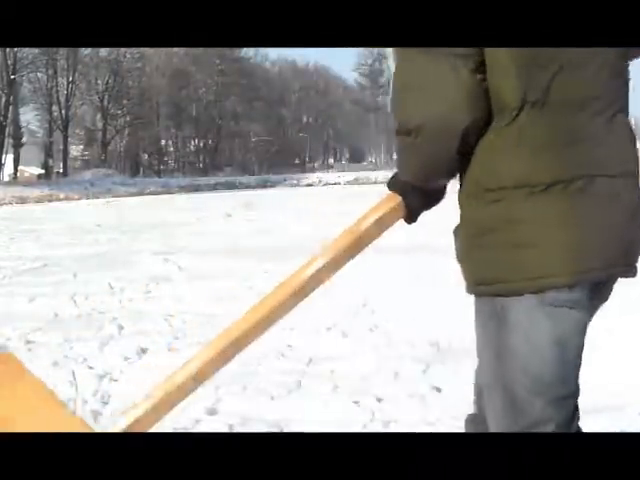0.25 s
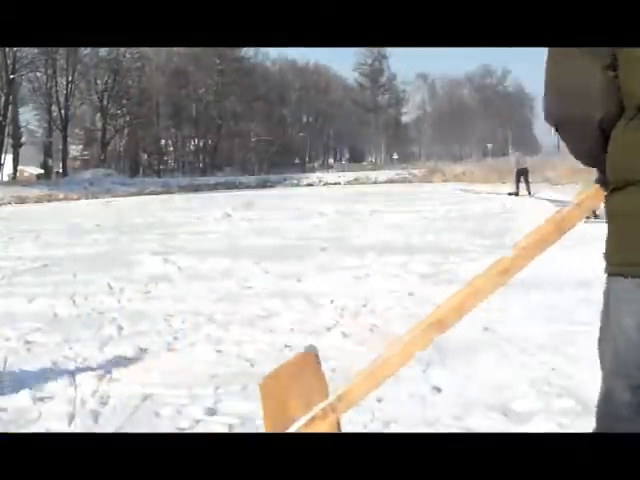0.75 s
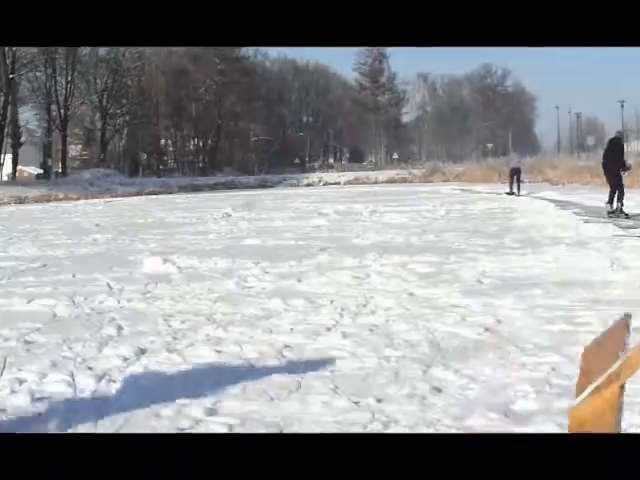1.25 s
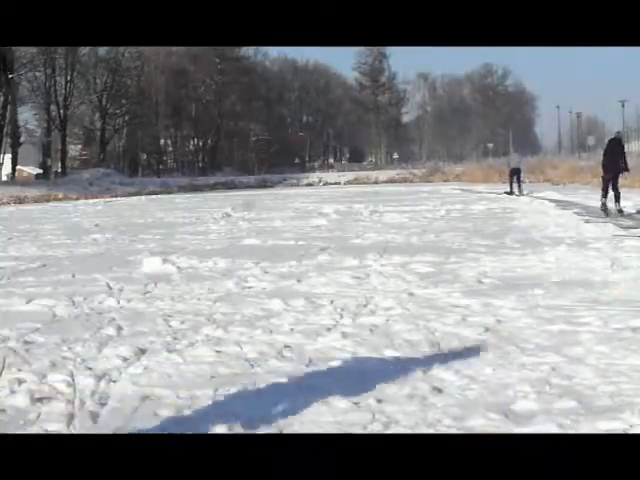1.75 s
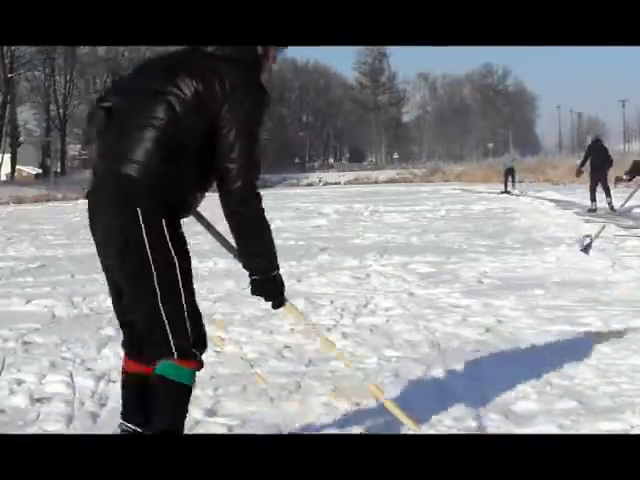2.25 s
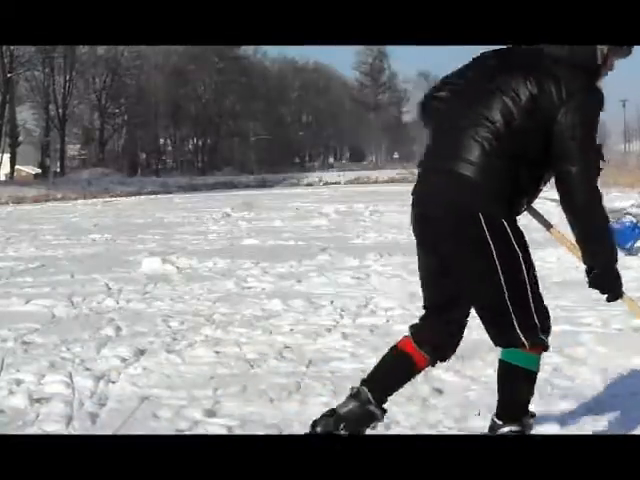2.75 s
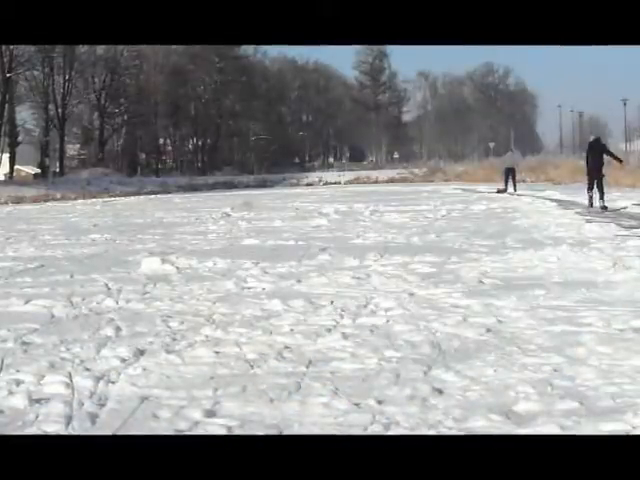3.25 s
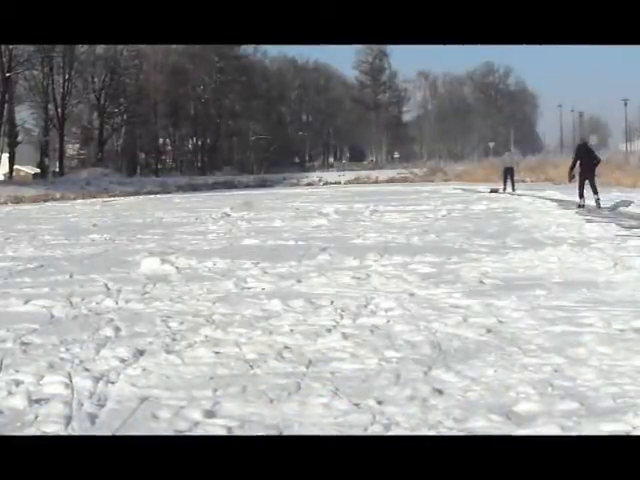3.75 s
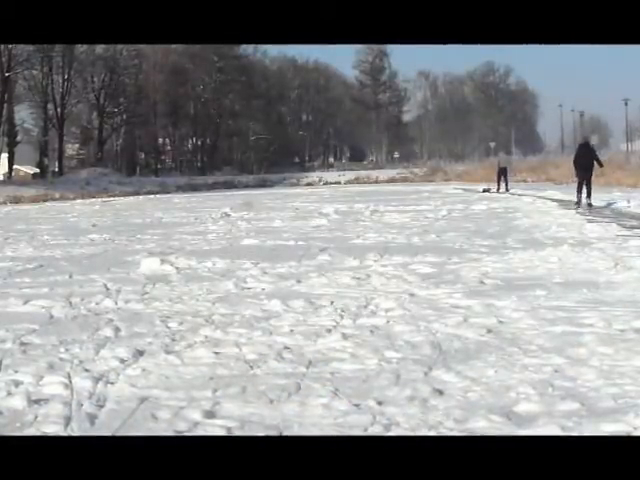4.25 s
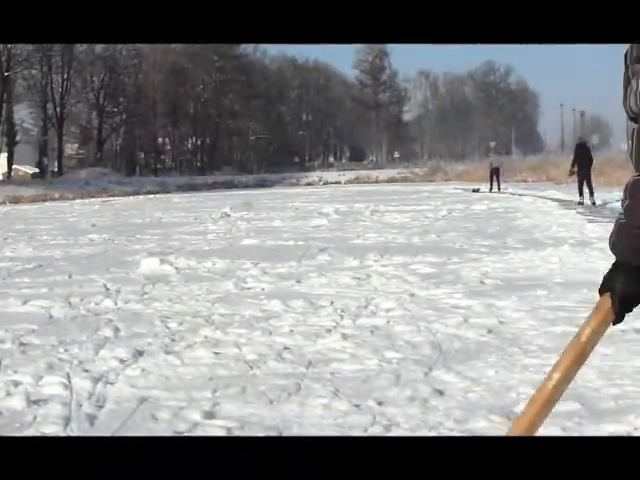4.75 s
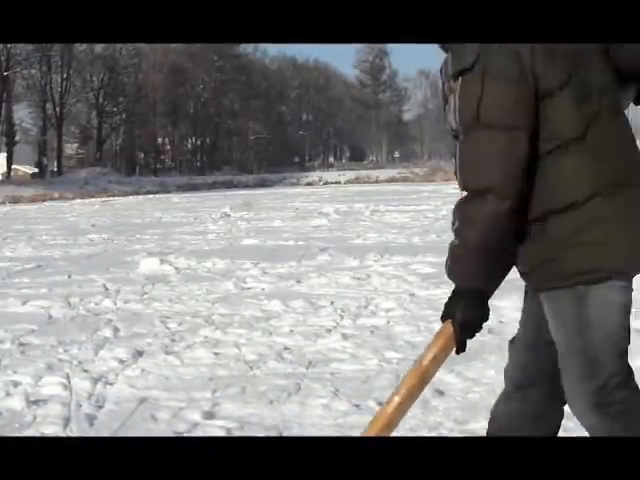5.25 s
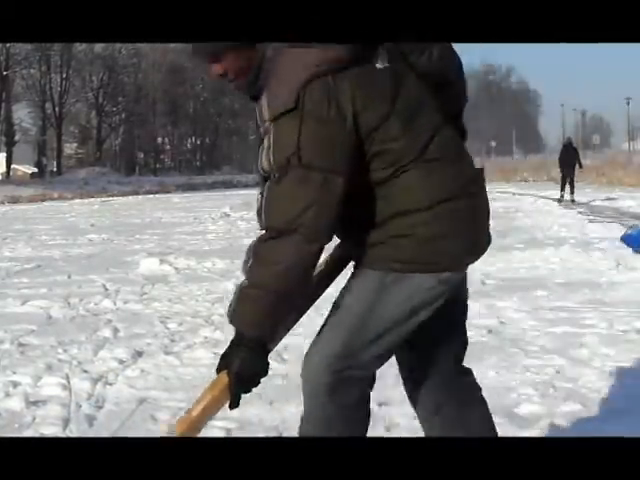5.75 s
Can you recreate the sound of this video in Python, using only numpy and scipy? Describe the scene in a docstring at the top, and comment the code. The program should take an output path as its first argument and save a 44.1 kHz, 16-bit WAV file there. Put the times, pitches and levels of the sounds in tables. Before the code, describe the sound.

Close open-air stereo, sound leaning right: light scuffs and a rattling double knock, a loud slam, then a hollow grating drone with a singing metallic edge. Next comes a rougher shovel pushing crushed snow, with icy thuds and crunches, cut off fairly abruptly. Quieter dull scraping continues to a small dry clack. Low wind bursts buffet the microphone over faint hiss.

```python
"""On a frozen river, snow shovels pass to the right: a blade is dropped, rattles, slams down on the ice and is pushed
along. Tiny fractures under its edge drive a drone, a singing edge resonance and a hiss of crushed snow; rattling
blows leave the blade ringing, and near the end another object gives a dry clack. Lumps of ice thud as damped sines;
crunches and ticks are short noise bursts. Wind buffets two microphone ports as separate low noises over a faint
hiss; the loudest peaks flatten in overload."""
import sys
import numpy as np
from scipy import signal
from scipy.fft import rfft, irfft, next_fast_len
from scipy.io import wavfile
from scipy.ndimage import uniform_filter1d, map_coordinates

SR = 44100
rng = np.random.default_rng(int(sys.argv[2]) if len(sys.argv) > 2 else 0)


def ratio(d):
    """dB to gain"""
    e = np.asarray(d, float) / 20
    return 10 ** e


def generate_wav(sig):
    """Save sig (samples, or channels by samples) to the path in sys.argv[1] as 16-bit PCM at SR."""
    pcm = np.round(np.clip(np.atleast_2d(sig).T, -1, 1) * 32767).astype(np.int16)
    wavfile.write(sys.argv[1], SR, pcm)


N = 264687


def unit(x):
    """Scale to an rms of 1."""
    return x / np.sqrt(np.mean(x ** 2) + 1e-20)


def along(points, hz):
    """Read (Hz, value) points on a log frequency axis."""
    f, v = np.transpose(points)
    return np.interp(np.log(hz + 1), np.log(f + 1), v)


def curves(rows, t):
    """Read each column after the time at times t."""
    s, *cols = np.transpose(rows)
    return [np.interp(t, s, c) for c in cols]


def wobble(rate):
    """A smooth random curve with rate knots a second."""
    knots = rng.standard_normal(int(N * rate / SR) + 4)
    return map_coordinates(knots, [np.arange(N) * rate / SR])


def filtered(x, response):
    """Shape x with a real or complex response of frequency."""
    m = next_fast_len(N + SR // 2)
    return irfft(rfft(x, m) * response(np.fft.rfftfreq(m, 1 / SR)), m)[..., :N]


def causal(points):
    """A short minimum-phase impulse with the colour of (Hz, dB) points, energy 1."""
    colour = ratio(along(points, np.fft.rfftfreq(4096, 1 / SR)))
    cepstrum = irfft(np.log(colour + 1e-4))
    # folding the cepstrum forward puts the energy at the start
    cepstrum[1:2048] *= 2
    cepstrum[2049:] = 0
    pulse = irfft(np.exp(rfft(cepstrum)))
    return pulse / np.linalg.norm(pulse)


def grit(rate, scatter_db):
    """Tiny fractures of uneven size, on average rate a second, at an rms of 1."""
    breaks = rng.random(N) < rate / SR
    return unit(breaks * rng.standard_normal(N) * ratio(scatter_db * rng.exponential(size=N)))


def beside(z, hz, t):
    """Place the spectra of a mid and a side sound as a partly alike pair, left later and weaker."""
    # Likeness of left and right. Each row: frequency in Hz, correlation.
    alike = [(300, 1), (1000, .98), (2500, 0.9), (5000, 0.85), (10000, 0.75)]
    # Path of the source. Each row: time in seconds, left lag in microseconds, left-over-right level in dB.
    sideways = [(.4, 0, -10), (.55, 0, -6), (1.5, 10, -6.5), (2.2, 35, -7), (3.5, 63, -6.5), (6, 63, -7)]
    lag, pan_db = curves(sideways, t)
    turn = np.arccos(np.clip(along(alike, hz), 0, 1))[:, None] / 2
    mid, side = np.cos(turn) * z[0], np.sin(turn) * z[1]
    # half of the lag and level goes to each side
    tilt = ratio(pan_db / 2) * np.exp(-1j * np.pi * hz[:, None] * lag / 1e6)
    pair = np.array([(mid + side) * tilt, (mid - side) / tilt])
    return signal.istft(pair, SR, nperseg=512)[1][:, :N]


def sheet(t60):
    """The many close modes of a thin blade: a fading noise tail of energy 1."""
    seconds = np.arange(SR // 2) / SR
    tail = rng.standard_normal(SR // 2) * ratio(-60 * seconds / t60)
    return tail[None] / np.linalg.norm(tail)


def contacts(t):
    """All sliding contacts at times t: (drone dB, edge centre and width Hz, hiss dB, edge gain dB, voice)."""
    # A bare blade pushed away over clean ice. Each row: time in seconds, drone level in dB before wavering.
    bare = [(.96, -28.5), (1.21, -26), (1.47, -29), (1.66, -33), (1.72, -37.5), (1.85, -34.5), (2.05, -39),
            (2.3, -35.5), (2.75, -47.5), (3.0, -62)]
    # Its edge sings higher as it speeds up, then sags and blurs.
    # Each row: time in seconds, edge resonance in Hz, its width in Hz.
    glide = [(1.0, 2050, 1150), (1.25, 2650, 1100), (1.55, 3050, 1150), (2.0, 2900, 1900),
             (2.3, 2650, 1500), (2.8, 2750, 1800)]
    # A blade loaded with snow comes past, shoves and stops.
    # Each row: time in seconds, drone level in dB before wavering, snow hiss in dB over the drone.
    loaded = [(2.1, -41.5, -21.5), (2.7, -32.5, -4.5), (2.82, -31, -2.5), (3.02, -33, -8), (3.19, -33, 1.5),
              (3.27, -30, -3.5), (3.5, -33.5, 1), (3.7, -32.5, 1), (4.2, -27, 4.5), (4.36, -31.5, 6.5),
              (4.5, -42.5, 4), (4.78, -46, 4), (4.87, -62, -4)]
    # A blade deep in snow draws near, muffled. Each row: time in seconds, drone level in dB before wavering.
    buried = [(4.3, -47), (4.6, -40), (5.05, -45.5), (5.45, -45), (5.8, -37), (5.87, -43), (6.0, -36.5)]
    # Light scuffs of a dragged blade. Each row: start in seconds, drone level in dB before wavering,
    # length before the fade in seconds, starting edge resonance in Hz, snow hiss in dB over the drone.
    scuffs = [(-.08, -62.5, 0.078, 1640, 1), (0.19, -67, .1, 1190, -9), (0.322, -47.5, 0.11, 2770, -8),
              (0.622, -40, 0.052, 2050, -7), (0.762, -44, .2, 2020, -6), (4.848, -59, 0.18, 2630, -16),
              (5.847, -44.5, 0.065, 2200, -4.5)]
    # Voice of each contact: drone pitch ratio, edge in dB over the drone, top of the hiss in Hz,
    # ringing share from 0 to 1. The bare edge gets a further gain and the loaded hiss dulls, both below.
    bare_voice = (1.043, 5.1, 10200, 0.41)
    loaded_voice = (1.0, -1, 9796, 0.15)
    buried_voice = (.81, -14, 5100, .03)
    scuff_voice = (.9, 4, 5500, .04)

    def inside(rows):
        """Silence, in dB, outside the time span of a contact."""
        return -150 * ((t < rows[0][0]) | (t > rows[-1][0]))

    # bare: edge and hiss gain 3 dB a second on the drone as the blade leaves
    bare_db = curves(bare, t)[0] + inside(bare)
    thin_db = 3 * (t - bare[0][0])
    rows = [(bare_db, curves(glide, t), -2 + thin_db, thin_db, bare_voice)]

    # loaded: as the blade slows, its hiss dulls
    pitch, edge_db, top_hz, ringing = loaded_voice
    loaded_db, loaded_hiss_db = curves(loaded, t)
    dulling_hz = np.interp(t, (4.41, 4.52), (top_hz, 7200))
    rows.append((loaded_db + inside(loaded), (2670, 2400), loaded_hiss_db, 0,
                 (pitch, edge_db, dulling_hz, ringing)))

    buried_db = curves(buried, t)[0] + inside(buried)
    rows.append((buried_db, (2450, 830), -29.5, 0, buried_voice))

    attack_s, fade_db_per_s, rise_hz_per_s, width_hz = 0.033, 75, 3200, 1550
    for s, db, length, edge_hz, hiss_db in scuffs:
        attack_db = 20 * np.log10(np.clip((t - s) / attack_s, 1e-4, 1) ** 2)
        fade_db = fade_db_per_s * np.maximum(t - s - length, 0)
        rising_hz = edge_hz + rise_hz_per_s * np.clip(t - s, 0, length)
        rows.append((db + attack_db - fade_db, (rising_hz, width_hz), hiss_db, 0, scuff_voice))
    return rows


def scrape():
    """Fractures under the edge drive the low drone, a resonance of the edge, and the hiss."""
    # Strongest resonances of the sliding blade.
    # Each row: centre in Hz, width in Hz, peak in dB over the direct sound.
    chatter = [(889, 54, 7), (7160, 1000, 12.5)]
    # Colour of the drone at pitch ratio 1. Each row: frequency in Hz, relative density in dB per Hz.
    drone_colour = [(180, -38), (300, -17), (468, -2.5), (963, 5), (1160, 3), (2400, -4), (3120, -107.5),
                    (5280, -120)]
    # Colour of the crushed snow. Each row: frequency in Hz, relative density in dB per Hz.
    hiss_colour = [(2000, -28.5), (3600, -6.5), (5200, -2.5), (7400, -7), (9500, -6.5), (12000, -3.5)]
    # The blade skips and the scrape drops out for a moment.
    # Each row: centre in seconds, level change in dB, length in seconds.
    skips = [(1.561, -7, 0.012), (1.764, -5, 0.026), (2.676, -4, 0.011), (3.46, -4, 0.037),
             (3.64, -5, 0.013), (5.072, -8, 0.021)]

    def strong(f):
        """The direct sound plus the resonances."""
        return 1 + sum(ratio(db) * 1j * f * w / (c * c - f * f + 1j * f * w) for c, w, db in chatter)

    def band(gain):
        """A spectral gain at an rms of 1."""
        return gain / np.sqrt(np.mean(gain ** 2, axis=0))

    rub = np.array([grit(9000, 0.56), grit(9000, 0.64)])
    # on bare ice the blade rings; deep snow damps it
    now = contacts(np.arange(N) / SR)
    loudness = sum(ratio(db) for db, *_ in now)
    share = np.clip(sum(ratio(db) * voice[-1] for db, *_, voice in now) / loudness, 0, 1)
    modes = signal.fftconvolve(rub, sheet(t60=0.058), axes=1)[:, :N]
    ringing = unit(filtered(modes, strong))
    rub = np.sqrt(1 - share) * rub + np.sqrt(share) * ringing
    rub = rub * ratio(0.86 * wobble(35) + 0.79 * wobble(13))

    hz, t, z = signal.stft(rub, SR, nperseg=512)
    f, power = hz[:, None], 0
    for drone_db, (edge_hz, width_hz), hiss_db, gain_db, (pitch, edge_db, top_hz, _) in contacts(t):
        drone = band(ratio(along(drone_colour, f / pitch)))
        edge = band(1 / (1 + ((f * f - edge_hz ** 2) / (f * width_hz + 1)) ** 2))
        hiss = band(ratio(along(hiss_colour, f)) / np.sqrt(1 + (f / top_hz) ** 14))
        layers = drone ** 2 + (edge * ratio(edge_db + gain_db)) ** 2 + (hiss * ratio(hiss_db)) ** 2
        power = power + ratio(2 * drone_db) * layers
    skips_db = sum(db * np.exp(-((t - s) / length) ** 2) for s, db, length in skips)
    # patches of time and frequency waver at random
    patches = uniform_filter1d(uniform_filter1d(rng.standard_normal(power.shape), 6, 0), 12, 1)
    return beside(z * np.sqrt(power) * ratio(skips_db + 1.73 * unit(patches)), hz, t)


def blows():
    """Each blow is a dense rattle of contacts that dies away, with more or less ringing after it."""
    # Rattling blows of a blade, and a last dry clack of another object with hardly any ringing.
    # Each row: start in seconds, relative level in dB, rattle in seconds,
    # fade of the rattle by 60 dB in seconds, treble in dB, ringing in relative dB.
    strikes = [(0.553, -24, 0.035, 0.06, 3.5, -6), (.596, -28.5, 0.0042, 0.082, -16, 2),
               (.614, -32, 0.02, 0.038, 3.5, -10.5), (.939, -15, 0.037, 0.2, -12.5, -21.5),
               (5.824, -33.5, 0.013, 0.064, -4.5, -32)]
    # Ringing modes of the blade. Each row: frequency in Hz, relative level in dB before scatter,
    # fade by 60 dB in seconds.
    blade = [(884, -23.5, 0.52), (1053, -30, 0.74), (1455, -11, 0.24), (2010, -22.5, 0.32),
             (4795, -21.5, 0.16), (6800, -24, .05)]
    # Body of a blow. Each row: frequency in Hz, relative density in dB per Hz.
    crash = [(120, -44.5), (250, -16), (600, -10.5), (900, -2.5), (1300, -8.5), (2400, -11.5), (3200, -20),
             (5200, -48.5)]
    # Treble of a blow. Each row: frequency in Hz, relative density in dB per Hz.
    splash_colour = [(2060, -48.5), (3500, -8.5), (4010, -10.5), (6780, 3.5), (11700, -6), (15200, -47),
                     (22000, -120)]
    out, t = np.zeros((2, N + 2 * SR)), np.arange(SR) / SR
    body, splash = causal(crash), causal(splash_colour)
    for s, db, rattle, t60, treble_db, ring_db in strikes:
        shape = ratio(-60 * np.maximum(t - rattle, 0) / t60) * (1 - np.exp(-t / 0.0027))
        hits = rng.standard_normal((2, SR)) * ratio(2.58 * rng.exponential(size=(2, SR))) * shape
        ring = 0
        for hz, level, decay in blade:
            mode_db = level + rng.normal(0, 2.05) + treble_db * (hz > 3500) - 60 * t / decay
            ring = ring + ratio(mode_db) * np.sin(2 * np.pi * hz * t)
        voice = ratio(ring_db - 14.0) * ring
        voice[:len(body)] += body + ratio(treble_db) * splash
        # a tail of dense modes rings along with the hits
        hits = hits + ratio(ring_db) * signal.fftconvolve(hits, sheet(t60=0.19), axes=1)[:, :SR]
        out[:, round(s * SR):][:, :SR] += ratio(db) * signal.fftconvolve(hits, voice[None], axes=1)[:, :SR]
    return out[:, :N]


def thuds(rows):
    """Damped sines with a soft onset, from rows of (s, relative dB, Hz, cycles of decay)."""
    out, t = np.zeros(N + SR), np.arange(SR // 10) / SR
    for s, db, hz, cycles in rows:
        decay = t * hz / cycles
        shape = np.exp(-decay) * (1 - np.exp(-3 * decay))
        out[round(s * SR):][:len(t)] -= ratio(db) * np.sin(2 * np.pi * hz * t) * shape
    return out[:N]


def lumps():
    """A lump of ice under boots or blade, or the knock in the clack, gives a few cycles at its own pitch."""
    # Lumps of ice, and at 5.83 s the knock in the dry clack.
    # Each row: start in seconds, relative level in dB, pitch in Hz, decay in cycles.
    knocks = [(3.074, -21, 748, 2.2), (3.13, -24, 900, 2), (3.219, -12, 670, 0.97),
              (4.825, -29.5, 674, 1.9), (5.459, -34, 800, 1.5), (5.511, -24.5, 620, 0.64),
              (5.751, -23, 900, 1.1), (5.83, -24.5, 553, 1.7), (5.953, -26, 1020, 1.9)]
    # gains in dB of the mid and side parts
    return thuds(knocks) * ratio([[8], [-3]])


def bursts():
    """Crunches, ticks and part of a dry clack: each a short burst of noise in one broad resonance."""
    # Short noise bursts: crunches, ticks and a dry clack. Each row: start in seconds, level in dB before
    # the envelope, centre in Hz, width in Hz (the lower edge stays at or above 100 Hz), length in seconds.
    burst_rows = [(.33, -50, 5000, 8000, 0.0033), (2.96, -23.5, 2940, 4000, 0.0087),
                  (3.073, -26.5, 5030, 3950, 0.0054), (5.111, -44, 3300, 500, 0.022),
                  (5.115, -54, 5000, 900, 0.034), (5.786, -44.5, 3660, 796, .008),
                  (5.826, -24, 1760, 250, 0.011), (5.826, -23, 3260, 900, 0.0093)]
    out, t = np.zeros((2, N + SR)), np.arange(SR // 10) / SR
    for s, db, hz, width_hz, length in burst_rows:
        edges_hz = [max(hz - width_hz / 2, 100), hz + width_hz / 2]
        sos = signal.butter(2, edges_hz, "bandpass", fs=SR, output="sos")
        burst = unit(signal.sosfilt(sos, rng.standard_normal((2, len(t)))))
        shape = np.exp(-(t / length) ** 2) * (1 - np.exp(-t / 0.00074))
        out[:, round(s * SR):][:, :len(t)] += ratio(db) * burst * shape
    return out[:, :N]


def wind():
    """Eddies thump each port separately, in short lumps; stronger wind brings more of the fast, spiky ones."""
    # Wind on the ports. Each row: time in seconds, buffet level in dB before the port offsets.
    gust_rows = [(0.0, -54.5), (0.32, -40.5), (0.37, -56.5), (0.9, -54.5), (1.0, -37), (1.34, -43.5),
                 (1.44, -28.5), (1.52, -38.5), (2.99, -26), (3.12, -42.5), (3.32, -28), (3.55, -33),
                 (3.59, -15.5), (3.72, -27.5), (3.84, -23.5), (3.9, -38), (5.03, -37), (5.1, -55),
                 (5.27, -66), (5.35, -33), (5.64, -36), (5.68, -60), (5.78, -32)]
    # Slow eddies. Each row: frequency in Hz, relative density in dB per Hz.
    buffet = [(20, -15), (60, -7.5), (115, -5.5), (240, -16.5), (500, -59.5)]
    # Fast eddies. Each row: frequency in Hz, relative density in dB per Hz.
    flutter = [(60, -22.5), (140, 1), (240, -2), (420, -12), (800, -48)]
    # Single eddies slapping mostly the right port.
    # Each row: start in seconds, level in dB before the port offsets, pitch in Hz.
    slaps = [(0.301, -24.5, 152), (2.178, -21, 160), (2.459, -16.5, 290), (2.567, -19, 192),
             (2.929, -23, 150), (3.408, -23, 240), (3.581, -17, 150), (4.569, -31, 300),
             (5.384, -16.5, 260.4)]
    # The right port faces the wind. Each row: buffet offset of one port in dB, left then right.
    ports_db = [
        [-11.5],
        [1.85],
    ]
    buffet_db, = curves(gust_rows, np.arange(N) / SR)
    slow = unit(filtered(rng.standard_normal((2, N)), lambda hz: ratio(along(buffet, hz))))
    flurries = np.array([grit(510, 1.6), grit(400, 2.4)])
    fast = unit(filtered(flurries, lambda hz: ratio(along(flutter, hz))))
    # fast over slow eddies in dB: 3.5 at a 0 dB buffet, 0.26 more per dB of wind
    spiky_db = 3.5 + 0.26 * buffet_db
    gusts_db = 2.83 * np.array([wobble(30), wobble(30)])
    eddies = unit((slow + fast * ratio(spiky_db)) * ratio(gusts_db))
    slapping = thuds([(*row, 1.1) for row in slaps]) * ratio([[-6], [8]])
    return eddies * ratio(buffet_db + ports_db) + slapping


def air():
    """A faint, smooth noise stands for the far field and the microphone hiss."""
    # Colour of the hiss. Each row: frequency in Hz, relative density in dB per Hz.
    air_colour = [(200, -37), (600, -3), (2000, -34), (4000, 2.5), (12000, -1.5)]
    return ratio(-63) * unit(filtered(rng.standard_normal((2, N)), lambda hz: ratio(along(air_colour, hz))))


def scene():
    """Mix the scrape, the placed impacts, the wind and the hiss."""
    hz, t, z = signal.stft(blows() + lumps() + bursts(), SR, nperseg=512)
    return scrape() + beside(z, hz, t) + wind() + air()


def top_cut(x):
    """Nothing passes above the cut-off."""
    return signal.sosfilt(signal.butter(12, 11860, fs=SR, output="sos"), x)


def record(dry):
    """The microphone path passes a band, and the loudest peaks flatten towards full scale."""
    # Band limits of the microphone path: low corner in Hz, top in Hz.
    band_hz = (50, 11750)
    low_hz, top_hz = band_hz

    def path(hz):
        """A bass roll-off and a steep treble edge 250 Hz wide."""
        return np.clip((top_hz - hz) / 250, 0, 1) ** 2 / np.sqrt(1 + (low_hz / (hz + 1)) ** 4)

    heard = filtered(dry, path)
    mix = heard / (1 + np.abs(heard) ** 12) ** (1 / 12)
    return top_cut(mix)


dry = scene()
out = record(dry)
generate_wav(out)
```